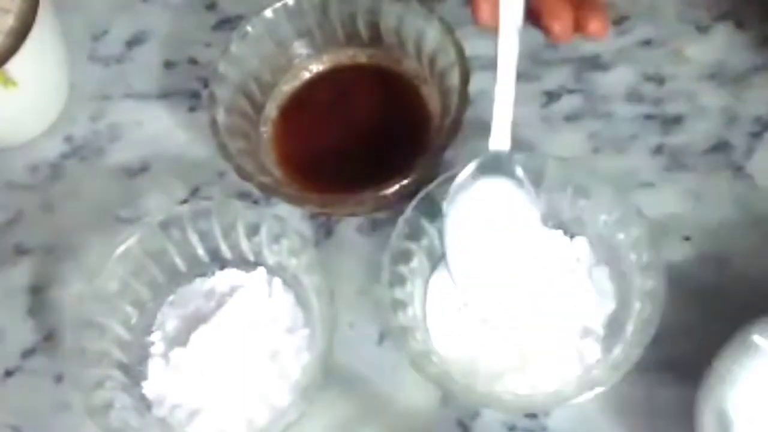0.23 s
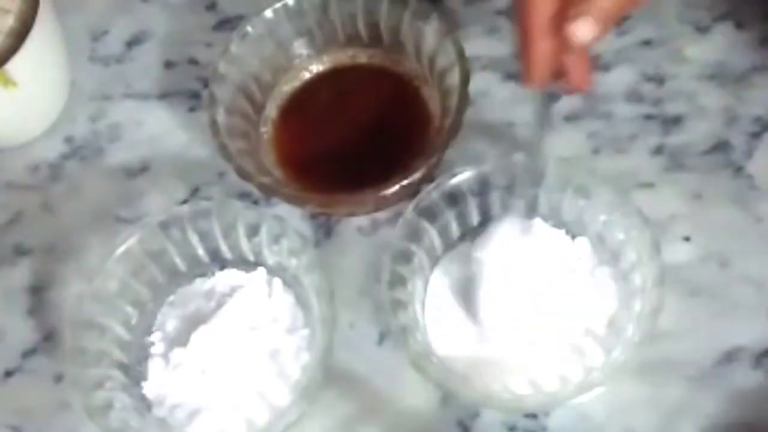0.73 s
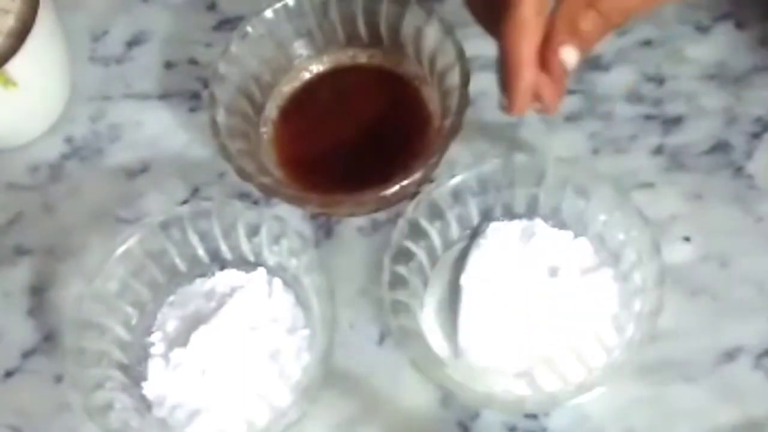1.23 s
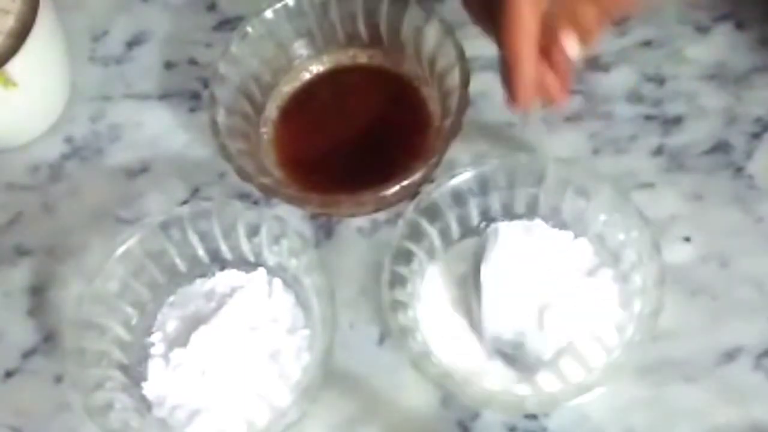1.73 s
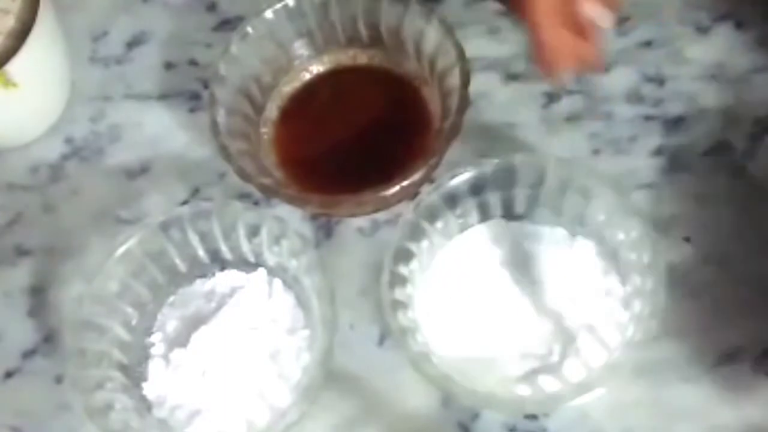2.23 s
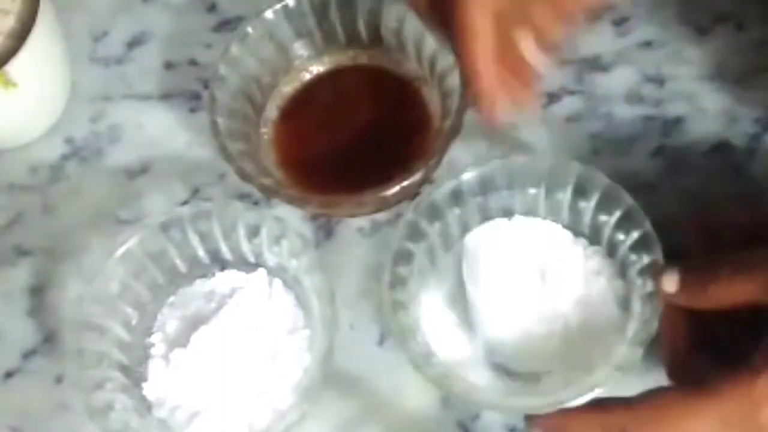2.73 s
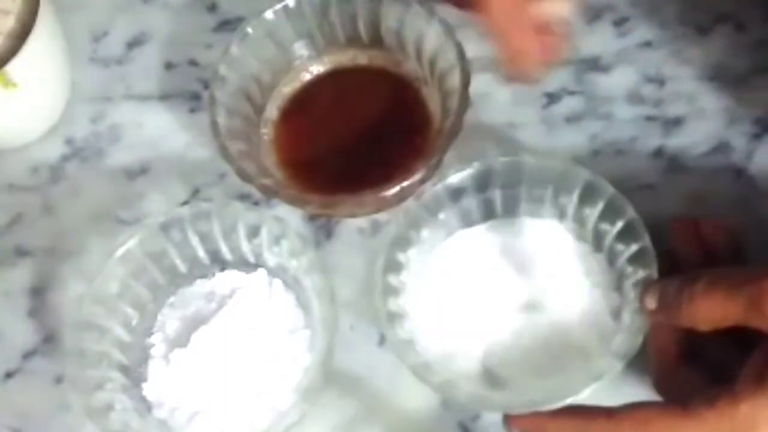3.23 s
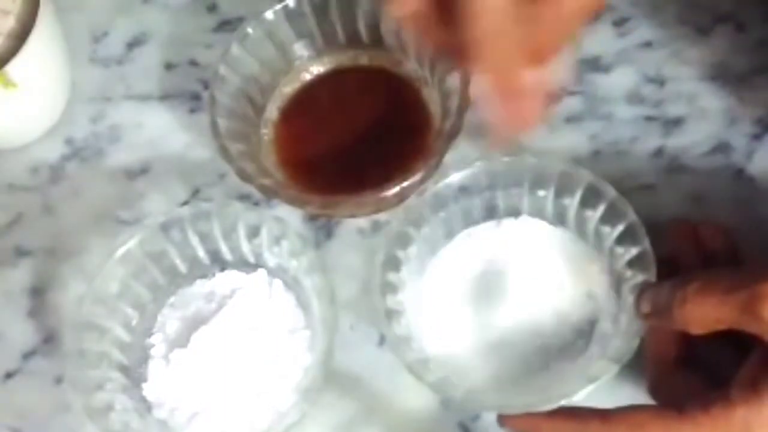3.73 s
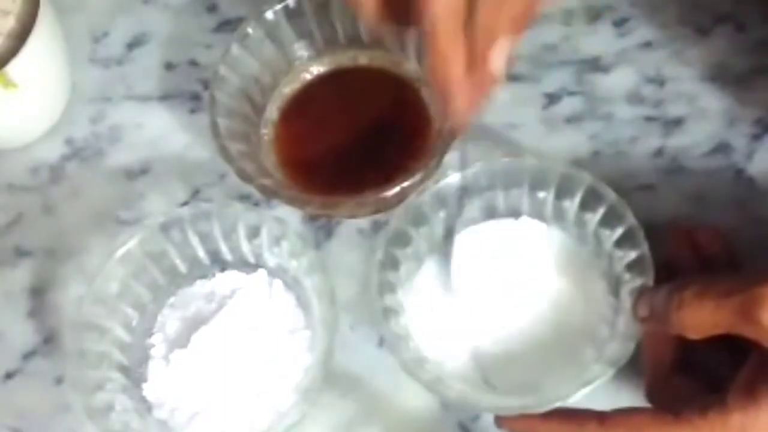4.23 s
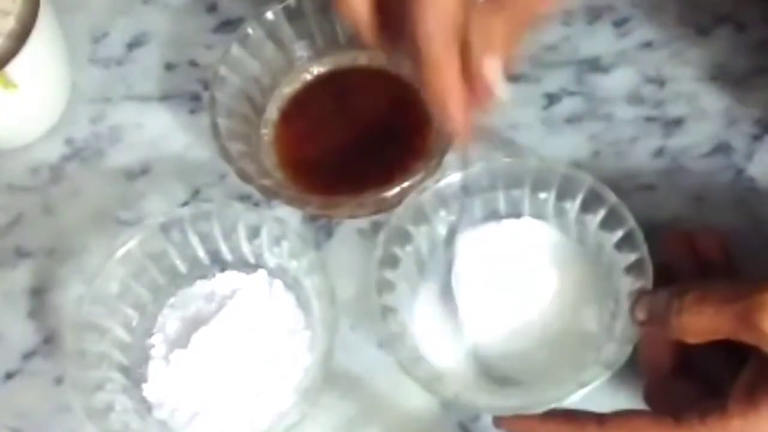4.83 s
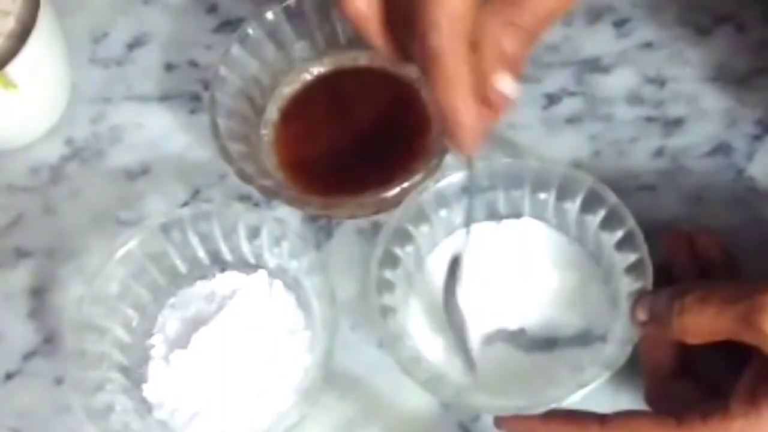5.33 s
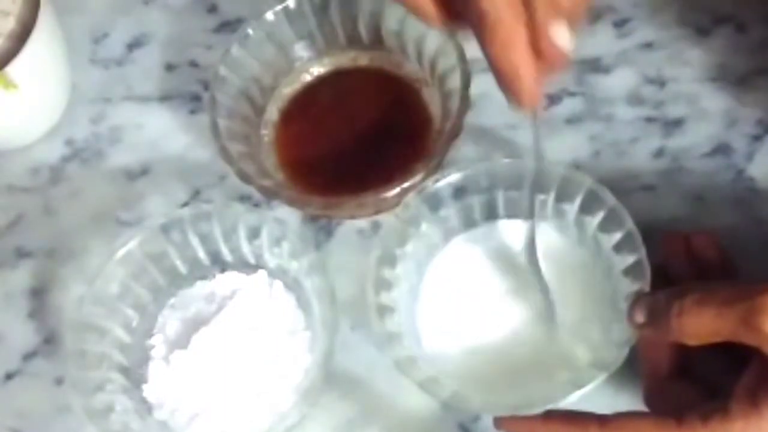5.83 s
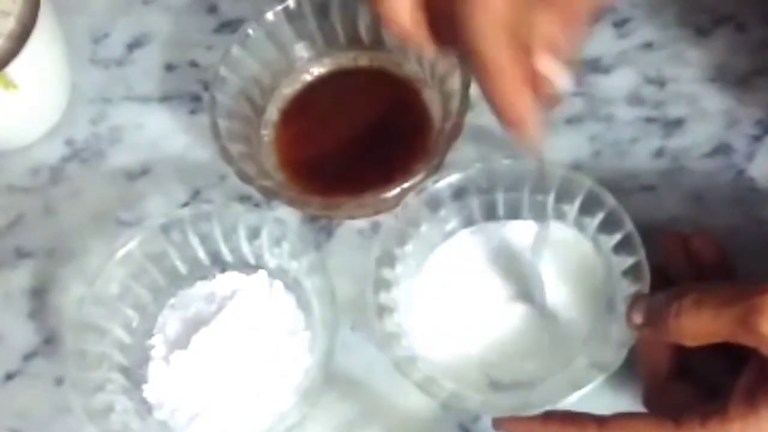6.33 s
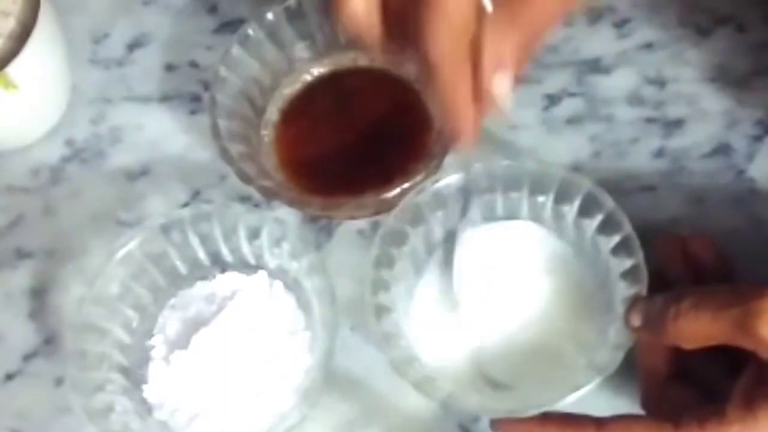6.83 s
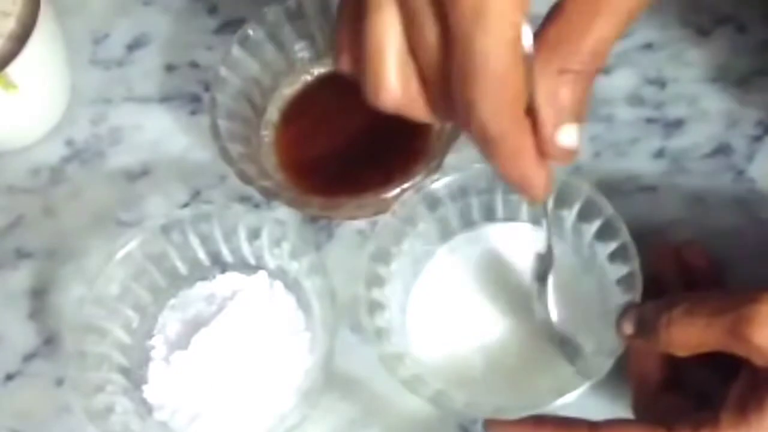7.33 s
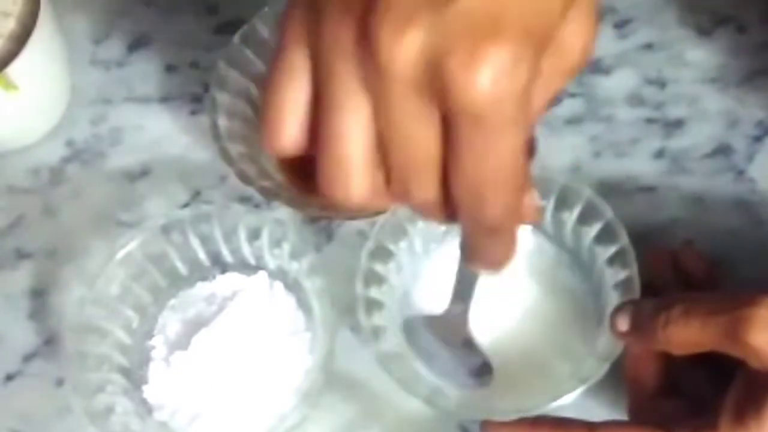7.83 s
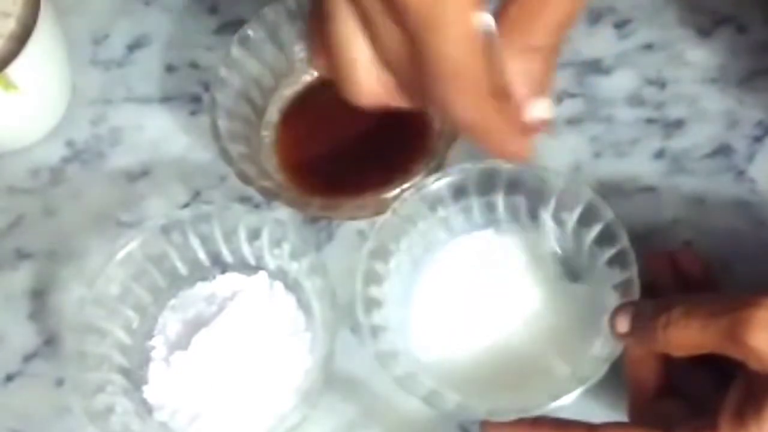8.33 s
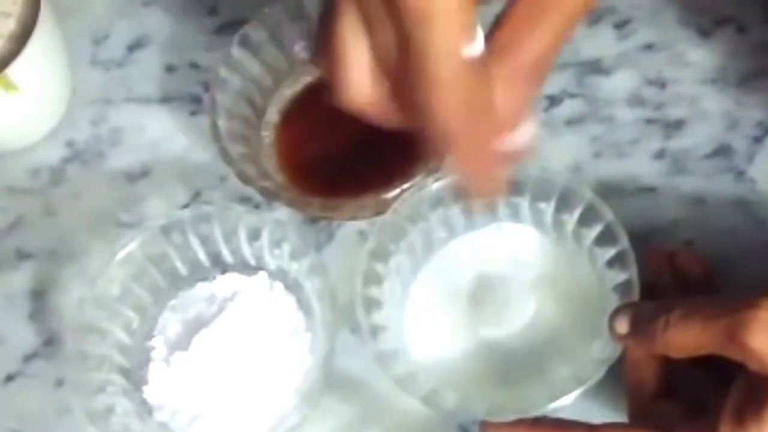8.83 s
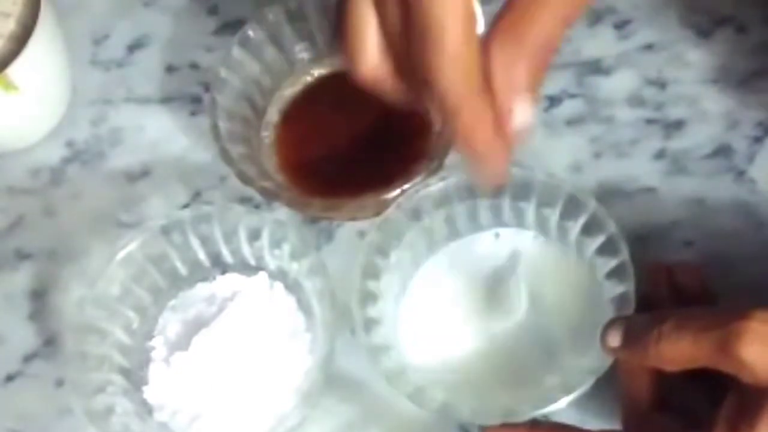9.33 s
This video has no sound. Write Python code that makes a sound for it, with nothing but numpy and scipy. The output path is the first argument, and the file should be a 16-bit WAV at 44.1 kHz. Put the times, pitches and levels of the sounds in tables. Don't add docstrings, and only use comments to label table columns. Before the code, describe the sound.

Close, irregular spoon knocks and short glassy clinks from a small bowl of thick white mixture, quiet at first, then firmer, in a hard kitchen.

```python
import sys
import numpy as np
from scipy import signal
from scipy.fft import rfft, irfft, next_fast_len
from scipy.io import wavfile
from scipy.ndimage import map_coordinates

SR = 44100
rng = np.random.default_rng(int(sys.argv[2]) if len(sys.argv) > 2 else 0)


def digitize_waveform(pressure):
    field = np.atleast_2d(pressure).T
    bounded = np.clip(field, -1, 1)
    quanta = np.round(bounded * 32767).astype(np.int16)
    wavfile.write(sys.argv[1], SR, quanta)


def undo_db(level):
    steps = np.asarray(level, float) / 20
    return 10 ** steps


N = 422478
HIT_LEN = SR // 3

# pitch_hz, density_db (per Hz)
RUMBLE = [(22, -44), (36, -9), (48, -4.5), (76, 0.5), (130, -8.5), (500, -18.5), (3000, -37.5),
          (5000, -100)]
# pitch_hz, width_hz, level_db
HUM = [(76, 7, 0.5), (118.7, 4.3, -5), (161.4, 7, 0.5), (289, 3.2, -12), (339, 5.4, -9)]
# start_s, level_db
HUM_SWELL = [(0.1, -38.5), (1.1, -48), (1.27, -36.5), (1.65, -38.5), (1.9, -44), (2.55, -46), (2.75, -49),
             (3.04, -50), (3.33, -46), (3.66, -49), (4.08, -48.5), (4.38, -41.5), (5.39, -38.5), (6.4, -37),
             (7.0, -36), (8.38, -56), (9.23, -34.5), (9.58, -49)]
# pitch_hz, density_db (per Hz)
HISS = [(710, -46), (1200, -32), (1750, 1), (1880, 3.5), (2090, 1), (2710, -5), (15500, -8)]
# pitch_hz, t60_s
KITCHEN = [(200, 0.52), (1000, 0.29), (4000, 0.32), (14000, 0.21)]

# start_s, pressure_db
SCRAPE = [(0.0, -72), (2.83, -62.5), (3.04, -53), (3.44, -71), (3.68, -95), (4.0, -47), (4.59, -63.5),
          (4.72, -56), (5.0, -69), (6.03, -69), (6.19, -57.5), (6.8, -59.5), (6.96, -60), (7.1, -51),
          (7.3, -62.5), (8.4, -67.5), (8.56, -61), (9.39, -55.5)]
# start_s, level_db, centre_hz
TICKS = [(0.0498, -40, 7700), (0.9034, -42, 7460), (1.291, -41, 12300), (3.707, -40, 11700),
         (5.4854, -36, 12500), (6.7491, -38, 12400), (7.496, -46, 8140), (7.5587, -34, 12400),
         (7.7154, -32.5, 12600), (7.8271, -40, 12800), (8.6607, -39.5, 9340), (9.0594, -48, 12600),
         (9.1391, -35, 12400), (9.4689, -37, 12800)]
# start_s, level_db, centre_hz
LOW_TICKS = [
    (.050, -39, 1950),
    (.069, -40, 1950),
    (.051, -41, 4800),
    (.904, -35, 1950),
    (.870, -52, 2600),
    (7.716, -36, 2400),
]

# start_s, knock_db, weight_db (counter, re knock)
NUDGES = [(0.973, -37, -18), (1.291, -33.5, -3), (2.333, -48, -15), (2.643, -32.5, -11),
          (3.412, -29.5, -19.5), (4.154, -31, -14), (4.384, -41, -10), (4.848, -28.5, -9.5),
          (5.184, -34, -9), (5.203, -33.5, -4), (5.551, -33, -23), (5.729, -35, -28), (5.969, -47, 1),
          (6.002, -30.5, -17), (6.057, -38.5, -20), (6.442, -27, -20), (6.477, -37.5, -4),
          (6.554, -34.5, -21), (6.643, -30.5, -36), (6.918, -31, 2.5), (7.049, -33, -5),
          (7.22, -30.5, -14.5), (7.339, -30.5, -12), (7.598, -25, -29), (7.627, -28, -9), (7.833, -39, 1),
          (7.95, -36.5, -2), (9.057, -32, -7.5), (9.334, -34, 3), (9.452, -33, -9)]
# start_s, knock_db, low_db (re knock), weight_db (counter, re knock)
KNOCKS = [(1.625, -27.5, -6, -5), (2.072, -24.5, -7.5, -13.5), (2.349, -16, -9.5, -16.5),
          (2.692, -22, -12.5, -21.5), (2.85, -30, -1, -6), (2.893, -19.5, -6.5, -18.5),
          (2.997, -25, -21, -15), (3.005, -16.5, -5.5, -17.5), (3.021, -21.5, 1, -20),
          (3.033, -18.5, -18, -16.5), (3.31, -19.5, -17, -24), (3.701, -25.5, -13, -11.5),
          (4.09, -19, -6, -18), (4.102, -22, -16, -16), (4.468, -14, -4, -12), (4.652, -23, -13, -12.5),
          (4.779, -20, -8.5, -14.5), (5.487, -24.5, -0.5, -10), (5.563, -20, -13.5, -21),
          (6.127, -16, -6, -13.5), (6.244, -18, -7, -18.5), (6.75, -13, -5, -14), (7.541, -12, -22, -13),
          (7.992, -13.5, -33, -14), (8.494, -17, -12, -18), (8.661, -16, -11, -18),
          (8.845, -15.5, -17, -15.5), (8.93, -19.5, -15, -37), (9.139, -10, -8.5, -18.5),
          (9.47, -15.5, -9.5, -18.5)]
# start_s, ring_db, second_db (re ring), upper_db (re ring), knock_db (bowl)
CLINKS = [(2.8376, -14, -11, -14, -12.5), (3.2214, -17, -15, -21, -14), (3.9557, -16, -19, -24.5, -14),
          (4.2807, -17.5, -18.5, -21, -18.5), (4.5995, -15, -18.5, -24.5, -13.5),
          (6.8774, -11.5, -22, -25, -12), (6.899, -27, -17, -40, -32), (7.0262, -33, -23, -19.5, -10.5),
          (7.412, -41, -14, -22, -46), (7.4971, -25, -9.5, -22.5, -40), (8.3634, -16.5, -3, -7, -17),
          (9.2694, -13.5, -19.5, -16.5, -10.5)]
LOADED_CLINKS = [
    (7.4983, -25, -10.5, -30, -10),
    (7.9874, -19, -16, -21.5, -26),
]

# pitch_hz, level_db, t60_s
BOWL_HIGH = [(1365, -3, .03), (1435, 0, .035), (1590, 0, .035), (1850, -7, .025), (2200, -11, .02),
             (3050, -22, .025)]
# pitch_hz, level_db, t60_s
BOWL_LOW = [(985, 0, .045), (1140, -4, .025)]
# pitch_hz, level_db, t60_s
FOOT = [(552, 0, .05), (640, -6, .03), (770, -4, .03), (480, -6, .03)]
# pitch_hz, level_db, t60_s
COUNTER = [(390, 0, .06), (325, -9, .05), (210, -18, .04)]

# pitch_hz, level_db, t60_s
RING_LOW = [(1900, 0, .09), (1905, -12, .44), (1927, -14, .28), (1858, -8, .12), (1988, -6, .12),
            (2200, -9, .06), (2320, -17, .05)]
# pitch_ratio (to the hit's own pitch), level_db, t60_s
RING_SECOND = [(1.0, 0, .045), (.996, -13, .3), (1.006, -12, .25), (.989, -9, .1), (.96, -10, .03),
               (.62, -21, .15)]
# pitch_hz, level_db, t60_s
RING_THIRD = [(8490, 6.5, 0.048), (8170, -19, 0.07), (8420, -16.5, 0.24), (8465, -5, 0.2),
              (9400, -6, 0.051), (6900, -22, 0.042)]
# pitch_hz, level_db, t60_s
RING_TOP = [(11725, 0, .08), (11915, -2, .08), (12520, -6, .035), (14285, -4, .05), (15050, -3, .07)]


def unit(x):
    return x / np.sqrt(np.mean(x ** 2) + 1e-20)


def along(points, hz):
    f, value = np.transpose(points)
    return np.interp(np.log(hz + 1), np.log(f + 1), value)


def curve(points):
    s, level_db = np.transpose(points)
    return np.interp(np.arange(N) / SR, s, level_db)


def wobble(rate):
    knots = rng.standard_normal(int(N * rate / SR) + 4)
    return map_coordinates(knots, [np.arange(N) * rate / SR])


def noise(gain):
    m = next_fast_len(N)
    spectrum = rfft(rng.standard_normal(m)) * gain(np.fft.rfftfreq(m, 1 / SR))
    return unit(irfft(spectrum, m)[:N])


def ring(modes, scale=1, scatter_db=4.5, rise_s=0.00029):
    t = np.arange(HIT_LEN) / SR
    hz, db, t60 = np.transpose(modes)[:, :, None]
    strength, detune = rng.standard_normal((2, len(modes), 1))
    struck_db = db + scatter_db * strength
    pitch_hz = hz * scale * (1 + 0.0033 * detune)
    waves = undo_db(struck_db - 60 * t / t60) * np.sin(2 * np.pi * pitch_hz * t)
    same_energy = np.sqrt(np.sum(undo_db(2 * db) * t60) / np.sum(undo_db(2 * struck_db) * t60))
    return same_energy * waves.sum(0) * (1 - np.exp(-t / rise_s))


def crack(t60, low_hz, high_hz):
    t = np.arange(HIT_LEN) / SR
    burst = undo_db(-60 * t / t60) * rng.standard_normal(HIT_LEN)
    band = signal.butter(2, [low_hz, min(high_hz, .45 * SR)], "band", fs=SR, output="sos")
    return signal.sosfilt(band, burst)


def kitchen(parts, wet_db):
    parts = np.atleast_2d(parts)
    hz, t, z = signal.stft(rng.standard_normal(HIT_LEN), SR, nperseg=256)
    dying = z * undo_db(-60 * t / along(KITCHEN, hz)[:, None])
    tail = signal.istft(dying, SR, nperseg=256)[1][:HIT_LEN]
    late_tail = np.pad(tail, (130, 0))
    echo = signal.fftconvolve(parts, late_tail[None], axes=1)[:, :HIT_LEN]
    direct = np.linalg.norm(parts, axis=1)
    share = undo_db(wet_db) * direct / np.linalg.norm(echo, axis=1)
    heard = parts + share[:, None] * echo
    steady = np.hypot(1, undo_db(wet_db)) * direct / np.linalg.norm(heard, axis=1)
    return steady @ heard


def add(track, s, hit):
    track[round(s * SR):][:len(hit)] += hit


def room_tone():
    rumble_db = -44.5 + 0.1726 * np.arange(N) / SR + 2.73 * wobble(7.3)
    rumble = undo_db(rumble_db) * noise(lambda f: undo_db(along(RUMBLE, f)))

    def hum_bands(f):
        return sum(undo_db(db) / (1 + ((f - hz) / width) ** 2) for hz, width, db in HUM)

    hum = undo_db(curve(HUM_SWELL) - 5.5) * noise(hum_bands)
    hiss = undo_db(-53.5) * noise(lambda f: undo_db(along(HISS, f)))
    return rumble + hum + hiss


def scrape():
    modes = BOWL_HIGH + BOWL_LOW + COUNTER + FOOT

    def bowl(f):
        power = sum(undo_db(2 * db) / (1 + ((f - hz) * t60 / 2.2) ** 2) ** 2 for hz, db, t60 in modes)
        return np.sqrt(power)

    pressure_db = curve(SCRAPE) + 7.5 + 0.67 * wobble(25) + 1.8 * wobble(70)
    return undo_db(pressure_db) * noise(bowl)


def ticks():
    out = np.zeros(N + SR)
    for s, db, hz in TICKS + LOW_TICKS:
        snap = crack(0.019, 0.847 * hz, 1.15 * hz)
        add(out, s, undo_db(db) * kitchen(snap / np.abs(snap).max(), wet_db=-5.0))
    return out[:N]


def knocks():
    out = np.zeros(N + SR)
    light = [(s, db, -9, weight_db) for s, db, weight_db in NUDGES]
    wall = [(s, db, -9, -16) for s, *_, db in CLINKS + LOADED_CLINKS]
    for s, db, low_db, weight_db in wall + KNOCKS + light:
        puff = undo_db(12.0) * crack(0.018, 1133, 1760)
        body = [
            ring(BOWL_HIGH, scatter_db=5.0, rise_s=0.0013) + puff,
            undo_db(low_db + 7.5) * ring(BOWL_LOW, rise_s=0.00058),
            undo_db(weight_db + 21.5) * ring(COUNTER, rise_s=0.011),
            undo_db(-11.5 + 0.3 * db) * crack(0.04, 1600, 4800),
            undo_db(9 + 0.52 * weight_db) * ring(FOOT, rise_s=0.0038),
        ]
        add(out, s, undo_db(db - 5.0) * kitchen(body, wet_db=-2.5))
    return out[:N]


def clinks():
    out = np.zeros(N + SR)
    for hits, second_hz in (CLINKS, 4860), (LOADED_CLINKS, 4675):
        for s, db, second_db, upper_db, _ in hits:
            glass = [
                ring(RING_LOW),
                undo_db(second_db + 7.5) * ring(RING_SECOND, second_hz),
                undo_db(upper_db + 1.5) * ring(RING_THIRD),
                undo_db(upper_db + 0.5) * ring(RING_TOP),
                undo_db(upper_db + 4.5) * crack(0.028, 3400, 22000),
                undo_db(second_db + 7.5) * crack(0.02, 1950, 6700),
            ]
            add(out, s, undo_db(db) * kitchen(glass, wet_db=-1.0))
    return out[:N]


def scene():
    return (room_tone() + scrape() + ticks() + knocks() + clinks())[None]


def top_cut(x):
    return signal.sosfilt(signal.butter(12, 16470, fs=SR, output="sos"), x)


def record(dry):
    soft = dry / (1 + np.abs(dry / 1.1) ** 3) ** (1 / 3)
    hz = np.fft.rfftfreq(N, 1 / SR)
    band_limit = undo_db(-np.clip((hz - 15450) / 10, 0, 33))
    bass_cut = 1 / np.sqrt(1 + (34.5 / (hz + 1)) ** 8)
    kept = irfft(rfft(soft) * band_limit * bass_cut, N)
    return top_cut(kept)


dry = scene()
out = record(dry)
digitize_waveform(out)
```